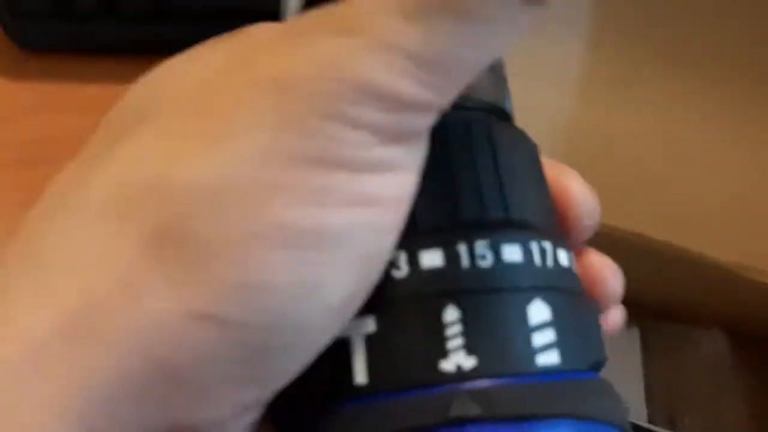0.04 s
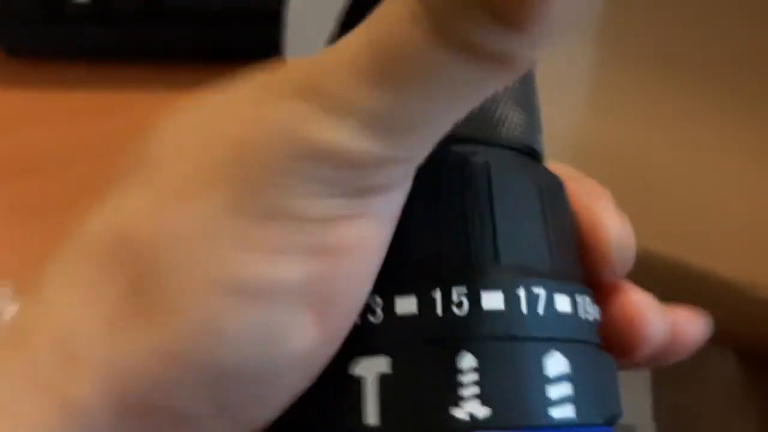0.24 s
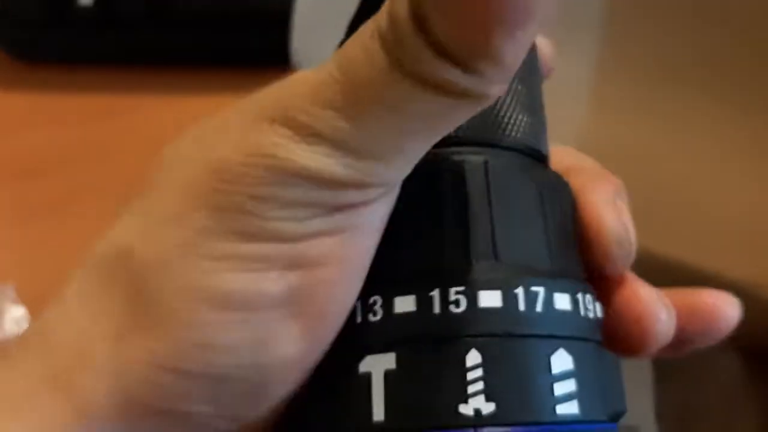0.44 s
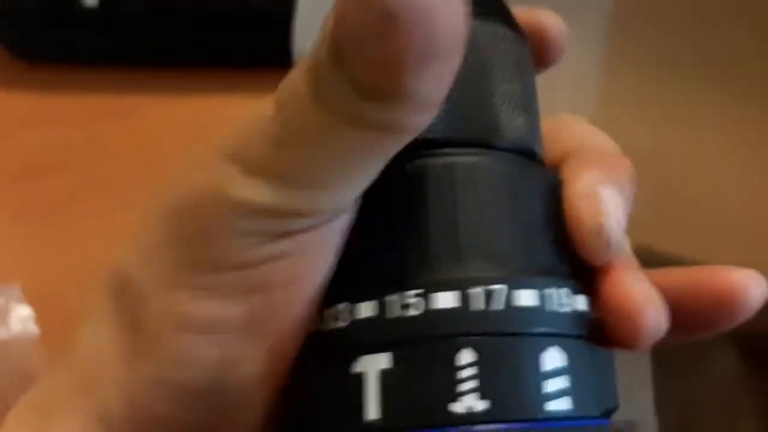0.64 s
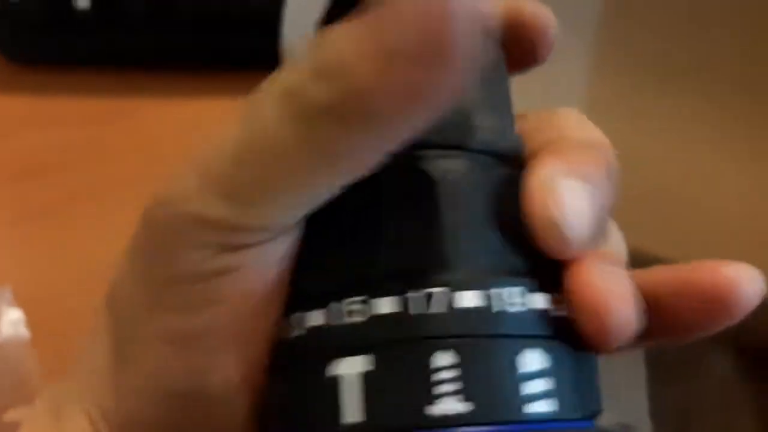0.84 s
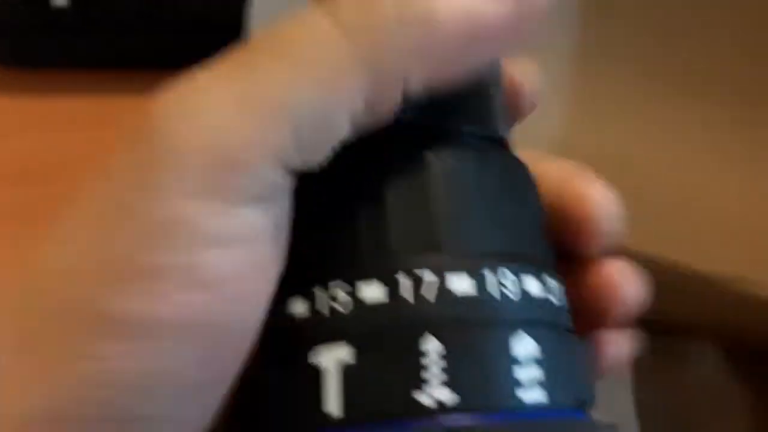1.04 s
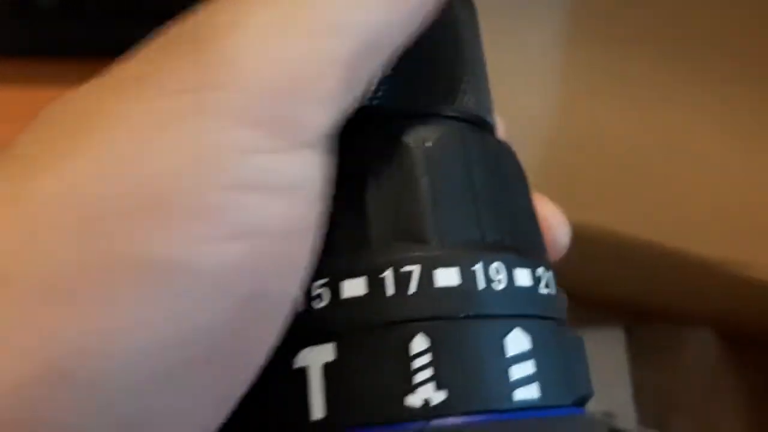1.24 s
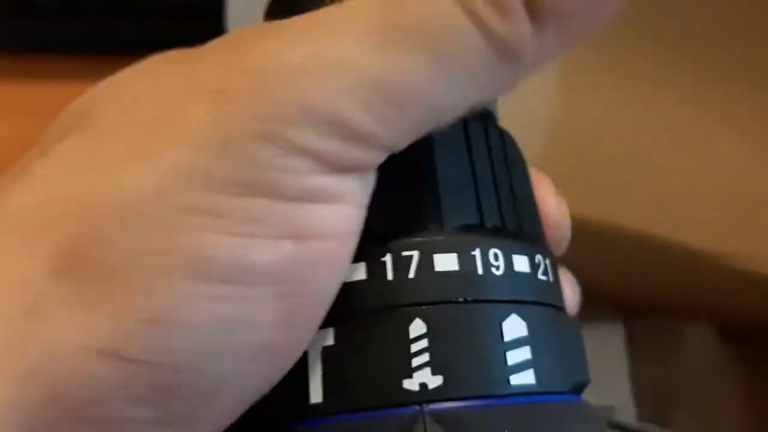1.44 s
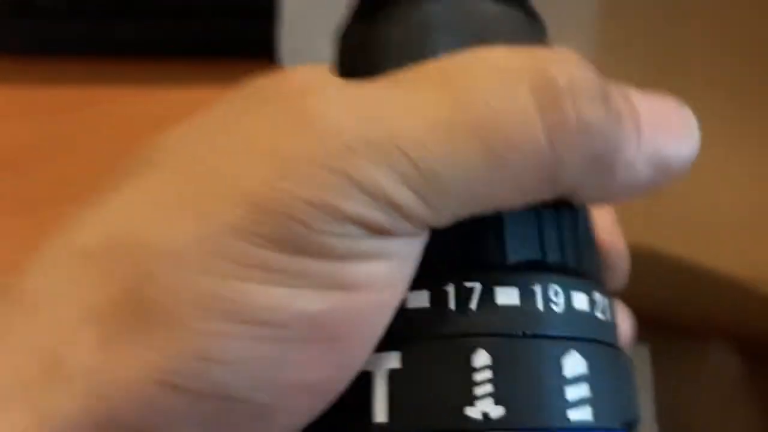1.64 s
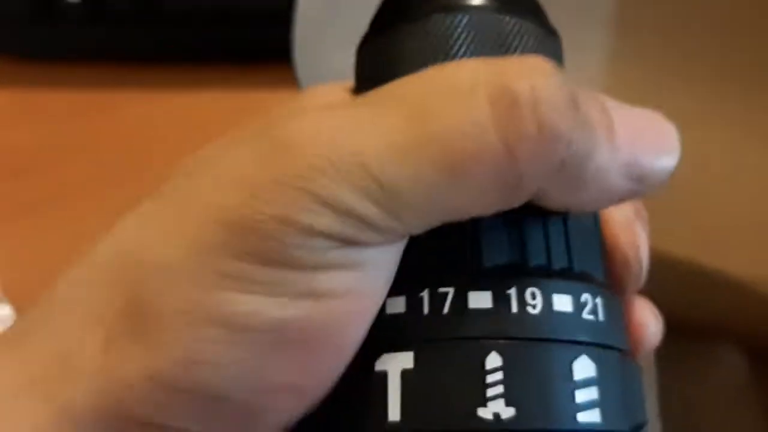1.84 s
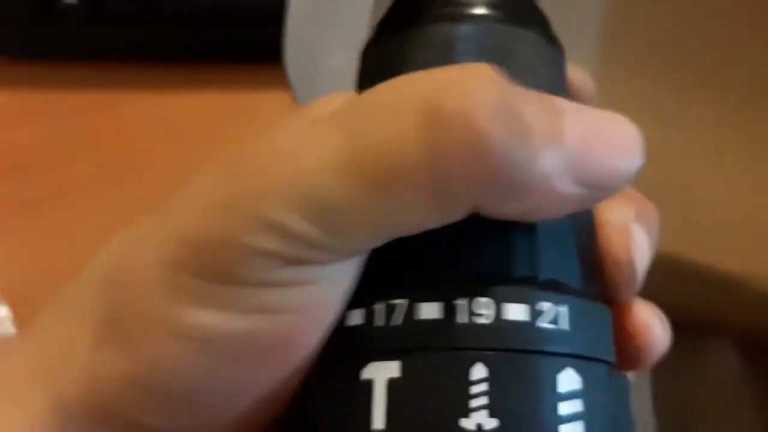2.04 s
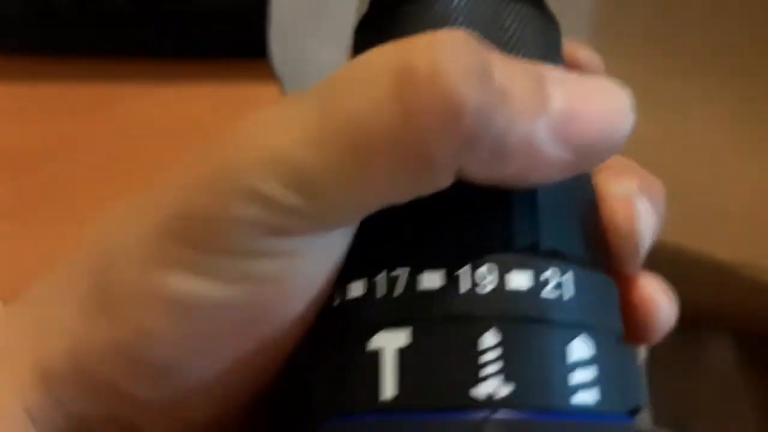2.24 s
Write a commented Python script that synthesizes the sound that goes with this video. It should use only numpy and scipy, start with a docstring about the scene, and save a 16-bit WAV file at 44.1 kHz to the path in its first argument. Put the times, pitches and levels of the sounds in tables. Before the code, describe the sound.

Close to the microphone, a drill's plastic collar snaps from notch to notch: three crisp clicks, a pause with faint skin rubbing on the housing, then two slightly hollower clicks. Each echoes briefly in a small, quiet room.

```python
"""Clicking a drill's clutch collar

A hand turns the collar of a cordless drill. Five times a spring snaps into its next notch, which
makes the plastic housing ring and jolts the nearby microphone. A desk and a small, lively room echo
each snap. Between turns the fingers tap and slide on the housing as they take a new grip."""
import sys
import numpy as np
from scipy import signal
from scipy.fft import rfft, irfft, next_fast_len
from scipy.io import wavfile
from scipy.ndimage import uniform_filter1d, map_coordinates

SR = 44100
rng = np.random.default_rng(int(sys.argv[2]) if len(sys.argv) > 2 else 0)


def output_pcm(signal):
    """Save a mono or channel-first signal as 16-bit PCM at the path in sys.argv[1].

    Samples are clipped to [-1, 1] before scaling.
    """
    pcm = np.clip(np.atleast_2d(signal).T, -1, 1) * 32767
    wavfile.write(sys.argv[1], SR, np.round(pcm).astype(np.int16))


N = 101429

# One row per snap: t/s, level/dB, clack/dB, hollow ring/dB, bright ring/dB, treble/dB,
# left minus right/dB, room echo/dB, low ring/dB, left jolt/dB, right jolt/dB
NOTCH_SNAPS = [(0.2265, -2, 2, 1.5, -0.5, 1.5, -3, -1, -37.5, -43, -36.5),
               (.5070, -3.5, 0.5, -3, -0.5, 0, -4, 3, -58, -38, -18),
               (.7106, -4.5, 1, 0.5, 0.5, 1.5, 0, 2, -47, -22, -37),
               (1.7468, -3.5, -2.5, 11.5, -7.5, -1, -5, 1.5, -41, -34, -41),
               (2.0182, -6, -3.5, 6.5, -5.5, 3, -4, 2.5, -45, -23, -36)]
# The tones the housing rings with: f/Hz, level/dB, t60/s (time to fade by 60 dB), left minus right/dB
HOUSING_TONES = [(1103, -22.5, 0.02, -25), (1280, -24.5, 0.034, -16.5), (1510, -15.5, 0.052, 8.5),
                 (2050, -14.5, 0.051, -4), (2630, -18, 0.0094, 36), (3150, -14, 0.011, 26.5),
                 (3750, -4.5, 0.016, 9.5), (4890, -8.5, 0.016, 9), (5686, 8.5, 0.0047, -8),
                 (6540, -5.5, 0.004, 10), (7190, -10.5, 0.043, 1.5), (10740, -6, 0.0087, 0.5),
                 (15700, -28.5, 0.036, 2.5), (14800, -20.5, .012, 5)]
# How strong the spring's crack is from low to high: f/Hz, level/dB
CRACK_SPECTRUM = [(200, -12.5), (800, -15.5), (1200, -11), (3300, 1), (4400, -7), (5800, 5), (7600, -0.5),
                  (8800, -16.5), (11500, 4), (15500, 2), (16800, -15.5)]
# Which side the crack comes from: f/Hz, left minus right/dB
CRACK_SIDES = [(1000, 9.5), (3500, 0.5), (6000, -18), (8200, 1), (9500, -21.5), (11200, 9), (15000, 13)]
# The microphone's bass-cutting filters: f/Hz, Q (higher rings longer)
MIC_LOW_CUTS = [(44, 2.86), (68, 1.38)]
# Fingers landing on the housing: t/s, ring level/dB, tick level/dB
FINGER_TAPS = [(0.0136, -22.5, -40.5), (1.1248, -43, -53)]
# A fingertip's tick: f/Hz, level/dB
TICK_SPECTRUM = [(300, -11), (1500, 7), (2700, -6), (3600, -2), (5200, -6.5), (7500, -31), (15000, -50)]
# Skin sliding on the housing: peak t/s, rise/s, fall/s, rub level/dB, hiss level/dB
FINGER_SLIDES = [(.025, 0.019, 0.067, -59.5, -66.5), (.215, 0.021, .02, -73, -63),
                 (.497, .02, 0.017, -62.5, -61), (1.02, .06, 0.075, -68, -59),
                 (1.14, 0.016, 0.048, -62.5, -67.5), (1.522, 0.02, 0.047, -57, -61.5),
                 (1.63, 0.055, 0.15, -70, -77), (2.27, .02, 0.043, -68.5, -76)]
# The low rub of sliding skin: f/Hz, level/dB
RUB_SPECTRUM = [(25, -26), (65, 0), (230, -7.5), (390, 5.5), (520, -5), (950, -13.5), (1300, -9.5),
                (2000, -12.5), (5000, -43.5)]
# The hiss of sliding skin and of the scraping spring: f/Hz, level/dB
HISS_SPECTRUM = [(500, -1.5), (1500, -22), (2200, -10.5), (4000, -1.5), (7200, -2), (8600, -19),
                 (11500, -8.5), (15500, -9)]
# The room's echo: f/Hz, level/dB
ECHO_SPECTRUM = [(25, -16), (55, 10.5), (200, -0.5), (410, -1.5), (560, -4.5), (850, -10.5), (1150, -5),
                 (1520, -1), (1800, -7.5), (2200, -2.5), (2900, -1.5), (4400, -6.5), (6100, 4),
                 (7600, -3.5), (8600, -13.5), (11500, 0.5), (15500, -5.5)]
# How long the echo lasts: f/Hz, t60/s
ECHO_DECAY = [(70, 0.78), (200, 0.95), (500, 0.46), (1500, 0.56), (3200, 0.52), (4600, 0.54), (6200, 0.53),
              (8000, .43), (11500, 0.38), (16000, 0.36)]
# The low tones the room booms with: f/Hz, level/dB, t60/s
ROOM_TONES = [(64.55, -50.5, 0.83), (178.2, -58, 1.4), (200.5, -51.5, 0.98), (434, -52, .5)]
# How alike spread-out noise is in both ears: f/Hz, likeness (1 the same, 0 unrelated)
EAR_LIKENESS = [(100, 0.9), (350, 0.85), (800, 0.12), (16000, 0)]
# The hush of the still room: f/Hz, level/dB
HUSH_SPECTRUM = [(25, -21), (55, -5), (210, -1.5), (300, -11.5), (390, -4.5), (970, -18.5), (2850, -15.5),
                 (3600, -12.5), (4500, -11), (6900, -17.5), (9000, -36.5), (11500, -22), (15500, -22.5)]
# Faint, steady whines: f/Hz, width/Hz, level/dB
WHINES = [(1560, 38, -86), (3510, 213, -74.5)]

SNAP_RISE_S = 0.00038
ROOM_ONSET_S, ROOM_BUILD_S = 0.0014, 0.014


def collar():
    """The spring scrapes up each notch and snaps in; the hand's grip changes the tone of each snap."""
    out, t = np.zeros((2, N)), np.arange(N) / SR
    scrape = wide_noise(HISS_SPECTRUM, N)
    low_ring_hz, low_ring_delay_s, climb_s = 397.1, 0.00887, 0.0025
    low_ring = np.sin(2 * np.pi * low_ring_hz * t) * fade(t, t60=0.15) * swell(t, ROOM_ONSET_S)
    for s, db, clack_db, hollow_db, bright_db, treble_db, pan_db, room_db, low_db, _, _ in NOTCH_SNAPS:
        def grip(hz):
            clack = clack_db * bell(hz, centre=1200, width=630)
            hollow = hollow_db * bell(hz, centre=3220, width=300)
            bright = bright_db * bell(hz, centre=6100, width=550)
            treble = treble_db * np.clip(2 * hz / 10700 - 1, 0, 1)
            return amp(db + clack + hollow + bright + treble)

        click = amp(-40) * scrape * np.exp(-abs(t - s) / climb_s)
        add(click, s, snap(pan_db, room_db))
        out += filtered(click, grip)
        add(out, s + low_ring_delay_s, amp(low_db) * low_ring[None])  # a boxy ring just after the snap
    return out


def snap(pan_db, room_db):
    """One snap cracks and rings, bounces off the desk and fills the room."""
    t = np.arange(SR) / SR
    direct = amp(-5.5) * crack(t) + amp(-17) * housing(t, SNAP_RISE_S)
    desk_delay_s = 0.0095  # the bounce comes late, with left and right swapped
    desk = filtered(direct[::-1], lambda hz: np.exp(-2j * np.pi * hz * desk_delay_s))
    boom = sum(amp(db) * fade(t, t60) * np.sin(2 * np.pi * (hz * t + rng.random()))
               for hz, db, t60 in ROOM_TONES)
    room = amp(-32) * room_echo() + boom * swell(t, ROOM_BUILD_S)
    return panned(pan_db) * direct + amp(-26.5) * desk + amp(room_db) * room


def crack(t):
    """The spring hits hard, then chatters as it settles while loose parts rattle."""
    def colour(hz):
        return amp(along(CRACK_SPECTRUM, hz)) * panned(along(CRACK_SIDES, hz))

    hz = np.fft.rfftfreq(SR, 1 / SR)
    delay_s, contact_max_s = 0.0004025, 0.02
    # The shell delays each frequency by a different amount, which smears the hit.
    spread = unit(uniform_filter1d(rng.standard_normal((2, len(hz))), size=900))
    phase = 2 * np.pi * np.cumsum(delay_s * (1 + spread / 2), axis=1)
    contact = unit(irfft(colour(hz) * np.exp(-1j * phase), SR)) * np.sqrt(delay_s)
    chatter = amp(-9.5) * fade(t, t60=0.014)
    rattle = amp(-22) * fade(t, t60=0.035)
    grit = unit(filtered(rng.standard_normal((2, SR)), colour))
    return contact * (t < contact_max_s) + grit * (chatter + rattle) * swell(t, SNAP_RISE_S)


def housing(t, rise_s, scatter_db=-0.5):
    """The plastic shell rings with its own tones, a little differently at each blow."""
    ring = 0
    for hz, db, t60, pan_db in HOUSING_TONES:
        gain = amp(db + scatter_db * rng.standard_normal()) * panned(pan_db)
        ring += gain * fade(t, t60) * np.sin(2 * np.pi * (hz * t + rng.random((2, 1))))
    return ring * swell(t, rise_s)


def jolts(push_s=0.00063):
    """Each snap gives the microphone a short push, which its bass filters turn into a thud."""
    def low_cut(f):
        return np.prod([-f * f / (hz * hz - f * f + 1j * f * hz / q) for hz, q in MIC_LOW_CUTS], axis=0)

    out = np.zeros((2, N))
    progress = np.arange(SR // 4) / SR / push_s
    thud = filtered(-progress * np.exp(-progress), low_cut)
    for s, *_, left_db, right_db in NOTCH_SNAPS:
        add(out, s, amp([[left_db], [right_db]]) * thud / abs(thud).max())
    return out


def taps(cutoff_hz=1800):
    """A soft fingertip makes a dull tick and rings mainly the housing's low tones."""
    out, t = np.zeros((2, N)), np.arange(SR) / SR
    for s, ring_db, tick_db in FINGER_TAPS:
        ring = amp(ring_db) * (housing(t, rise_s=0.0026) + amp(-31.5) * room_echo())
        tick = amp(tick_db) * wide_noise(TICK_SPECTRUM, SR) * fade(t, t60=0.028)
        add(out, s, tick + filtered(ring, lambda hz: 1 / (1 + (hz / cutoff_hz) ** 4)))
    return out


def slides():
    """Sliding skin makes a low rub and a hiss that swell and fade unevenly."""
    t, rub, hiss = np.arange(N) / SR, 0, 0
    for s, rise_s, fall_s, rub_db, hiss_db in FINGER_SLIDES:
        stroke = bell(t, s, np.where(t < s, rise_s, fall_s))
        rub += amp(rub_db) * stroke
        hiss += amp(hiss_db) * stroke
    flutter = stick_slip(rate_hz=43, depth_db=-1.5)
    return flutter * (rub * wide_noise(RUB_SPECTRUM, N) + hiss * wide_noise(HISS_SPECTRUM, N))


def stick_slip(rate_hz, depth_db):
    """Skin catches and lets go: the level glides between random values."""
    values = rng.standard_normal(SR // 10)
    return amp(depth_db * map_coordinates(values, [np.arange(N) * rate_hz / SR], mode="wrap"))


def room_echo():
    """One second of echo; each frequency dies away at its own speed."""
    hz, times, spectra = signal.stft(wide_noise(ECHO_SPECTRUM, SR), SR, nperseg=256)
    decay = fade(times, along(ECHO_DECAY, hz)[:, None])
    _, tail = signal.istft(spectra * decay, SR, nperseg=256)
    t = np.arange(SR) / SR
    return tail[:, :SR] * swell(np.maximum(t - ROOM_ONSET_S, 0), ROOM_BUILD_S)


def background():
    """The hush of the still room, with two faint whines made of narrow bands of noise."""
    whine = 0
    for hz, width, db in WHINES:
        band = filtered(rng.standard_normal((2, N)), lambda f: bell(f, hz, width / 2))
        whine += amp(db) * unit(band)
    return amp(-70) * wide_noise(HUSH_SPECTRUM, N) + whine


def wide_noise(spectrum, n, top_hz=15900):
    """Noise from all around: left and right are alike in the bass and unrelated in the treble."""
    def colour(hz):
        angle = np.arccos(np.clip(along(EAR_LIKENESS, hz), -1, 1)) / 2
        return amp(along(spectrum, hz)) * (hz < top_hz) * [np.cos(angle), np.sin(angle)]

    mid, side = filtered(rng.standard_normal((2, n)), colour)
    return unit(np.array([mid + side, mid - side]))


def amp(db):
    """Turn decibels into a gain to multiply by."""
    return 10 ** (np.asarray(db) / 20)


def unit(x):
    """Scale x to an average strength (rms) of 1."""
    return x / np.sqrt(np.mean(x ** 2) + 1e-20)


def along(points, hz):
    """Read between a table's rows on a log frequency scale."""
    freqs, values = np.transpose(points)
    return np.interp(np.log(hz + 1), np.log(freqs + 1), values)


def bell(x, centre, width):
    """A bell curve of height 1."""
    return np.exp(-.5 * ((x - centre) / width) ** 2)


def swell(t, rise_s):
    """Rise smoothly from 0 towards 1."""
    return 1 - np.exp(-t / rise_s)


def fade(t, t60):
    """Die away by 60 dB every t60 seconds."""
    return np.exp(-np.log(1000) * t / t60)


def panned(db):
    """Left and right gains that lie db decibels apart."""
    return amp(np.array([[.5], [-.5]]) * db)


def filtered(x, response):
    """Multiply each frequency in x by response(hz)."""
    n = x.shape[-1]
    padded = next_fast_len(n + SR // 4)
    return irfft(rfft(x, padded) * response(np.fft.rfftfreq(padded, 1 / SR)), padded)[..., :n]


def add(out, s, x):
    """Mix x into out, starting at s seconds."""
    start = max(round(s * SR), 0)
    out[:, start:start + x.shape[-1]] += x[:, :N - start]


def scene():
    """All the sounds together, in stereo."""
    return collar() + jolts() + taps() + slides() + background()


def record(dry):
    """The microphone loses the very highest treble."""
    top_hz = 16600
    return filtered(dry, lambda hz: 1 / (1 + (hz / top_hz) ** 120))


dry = scene()
out = record(dry)
output_pcm(out)
```